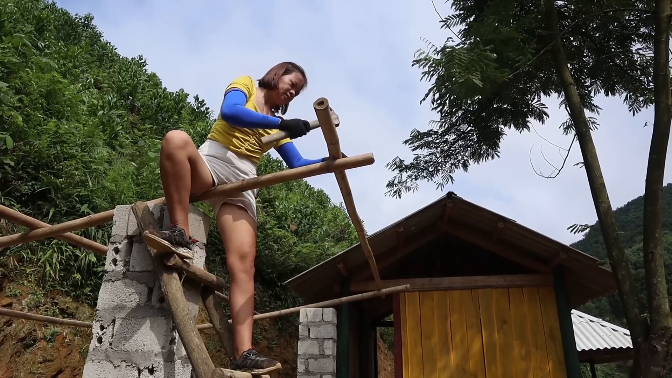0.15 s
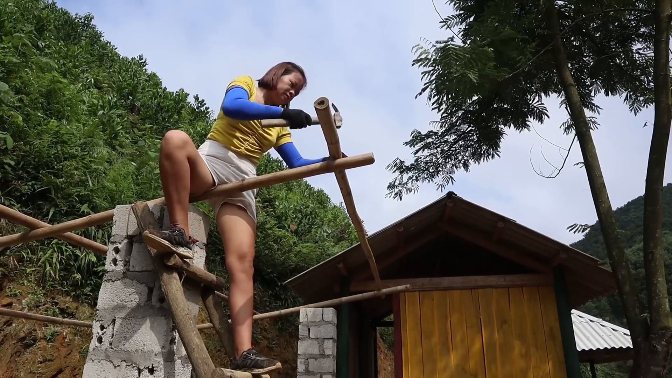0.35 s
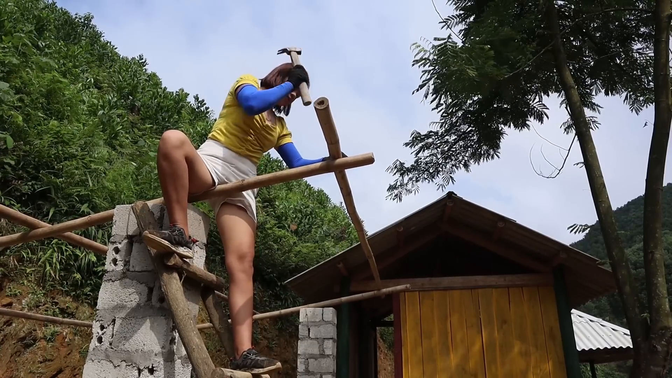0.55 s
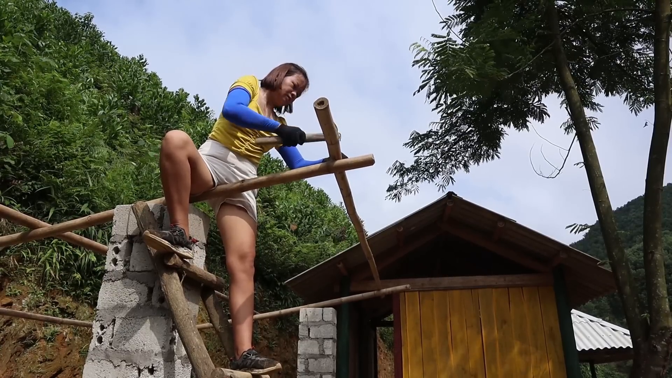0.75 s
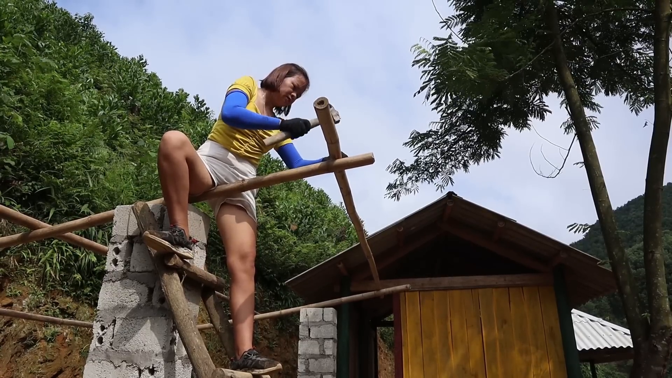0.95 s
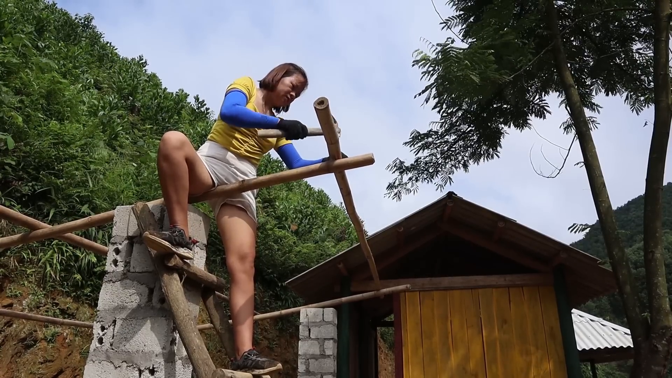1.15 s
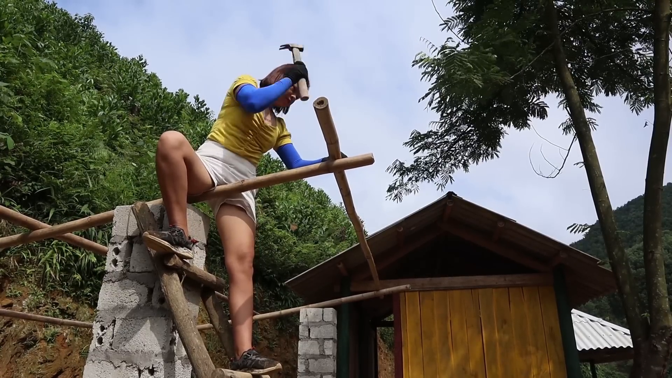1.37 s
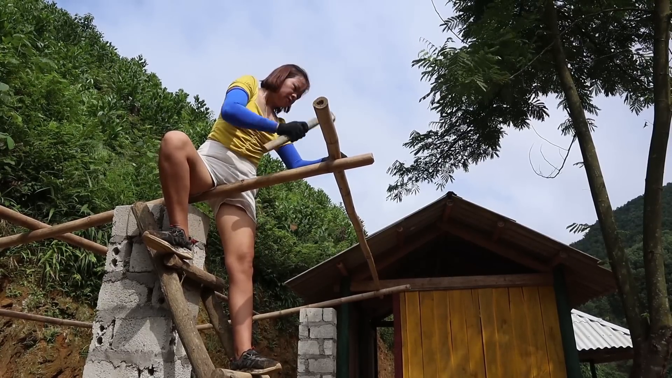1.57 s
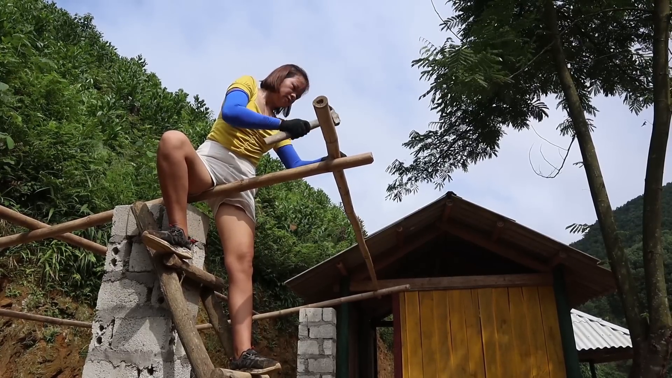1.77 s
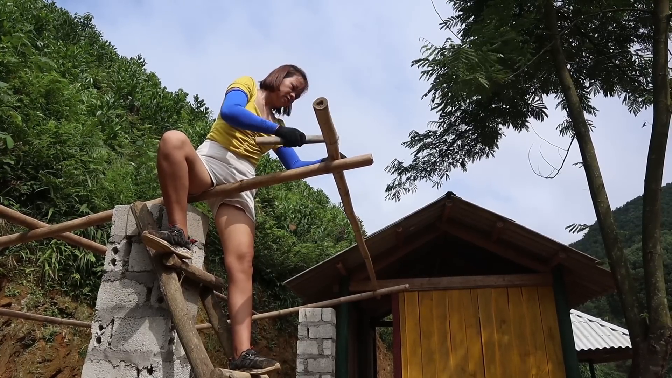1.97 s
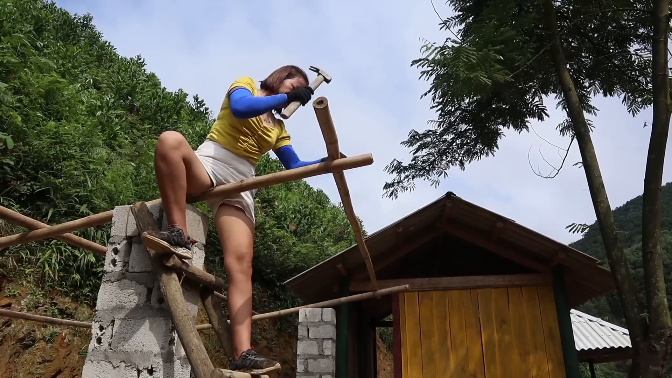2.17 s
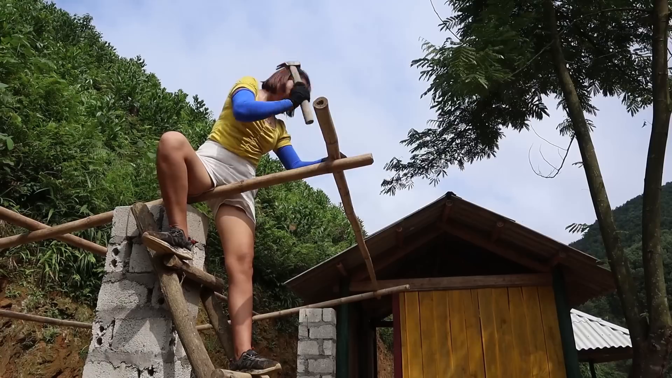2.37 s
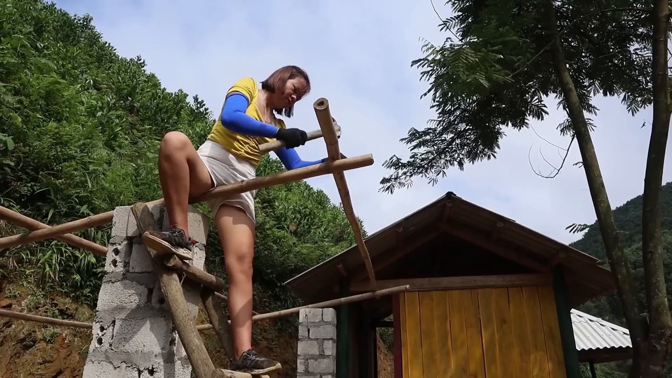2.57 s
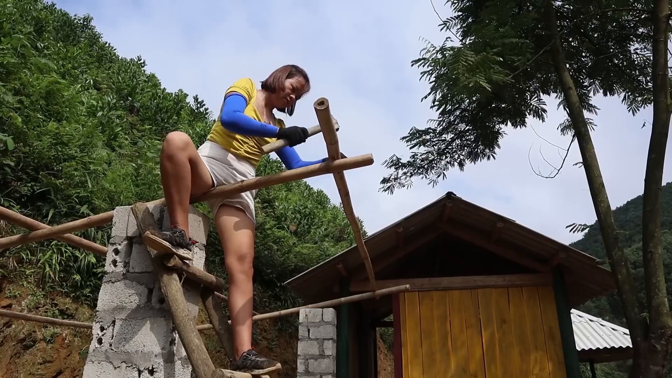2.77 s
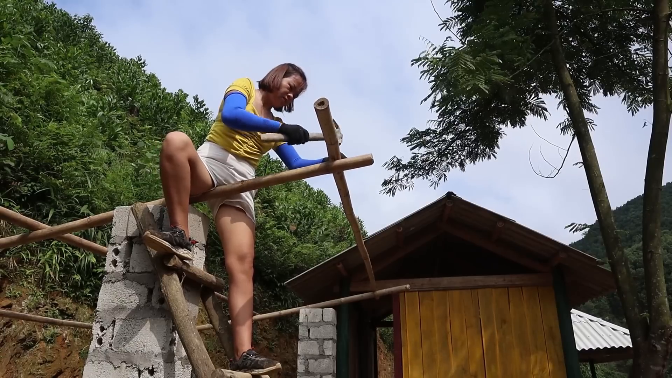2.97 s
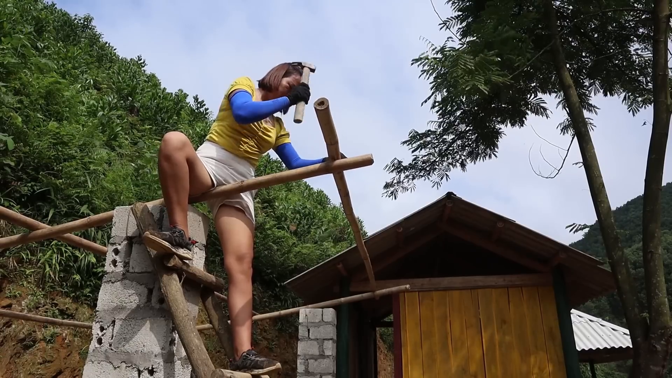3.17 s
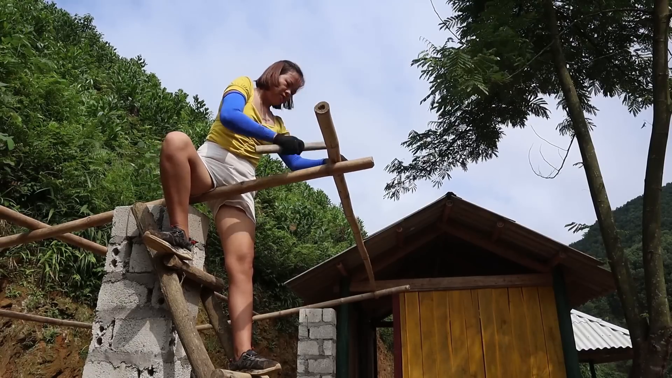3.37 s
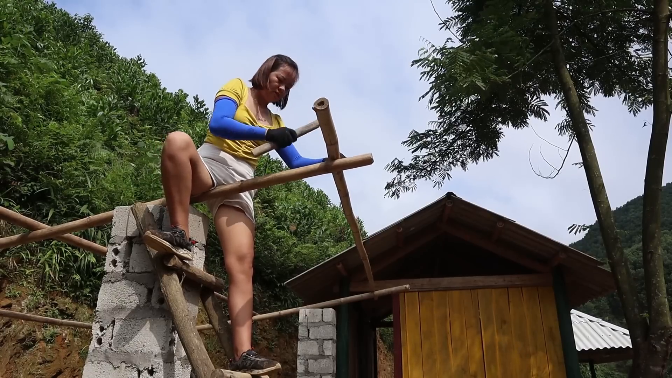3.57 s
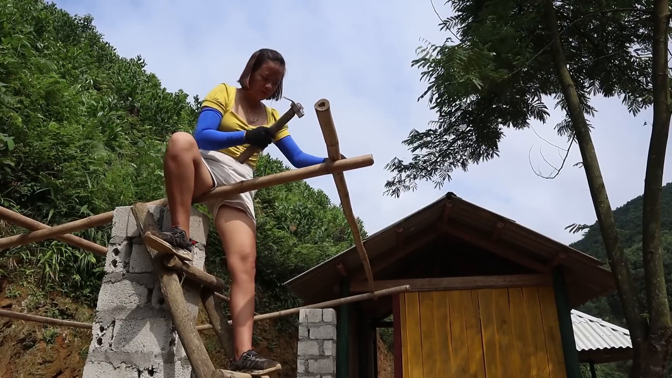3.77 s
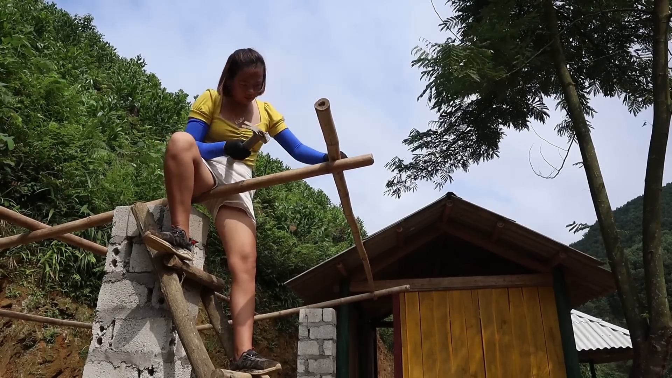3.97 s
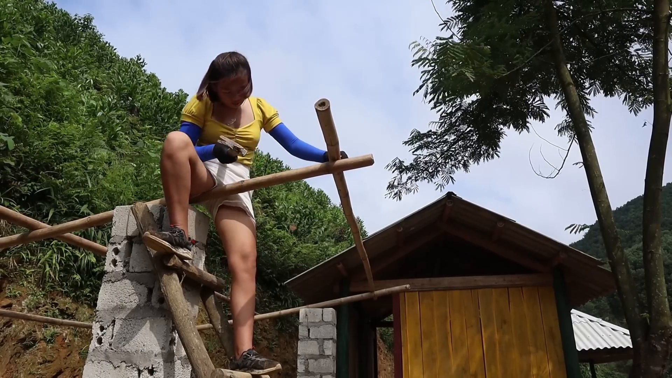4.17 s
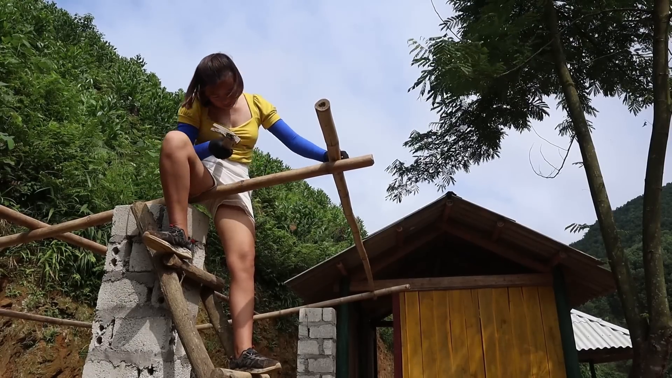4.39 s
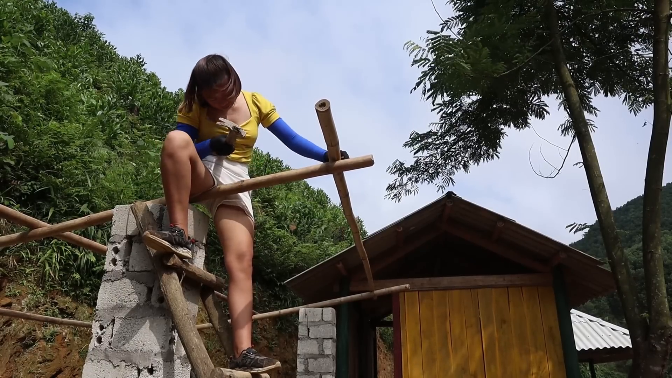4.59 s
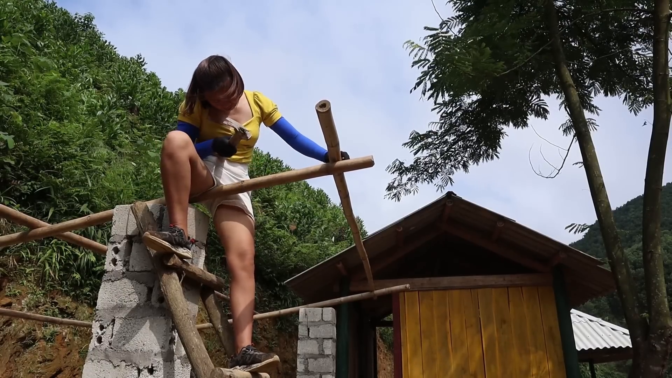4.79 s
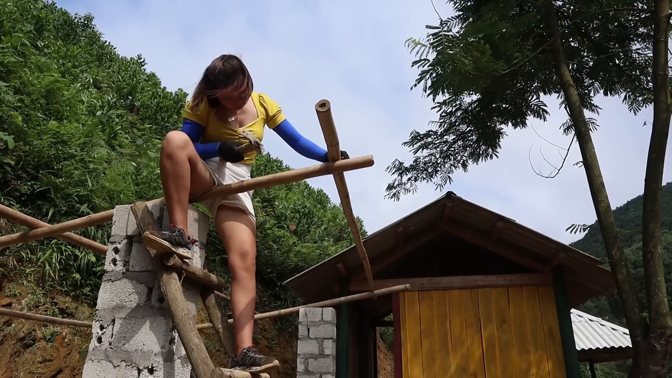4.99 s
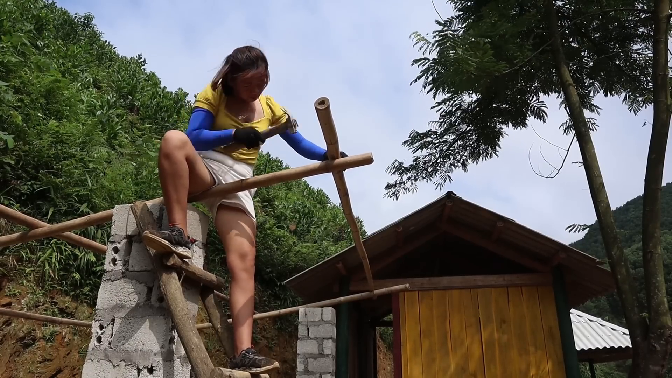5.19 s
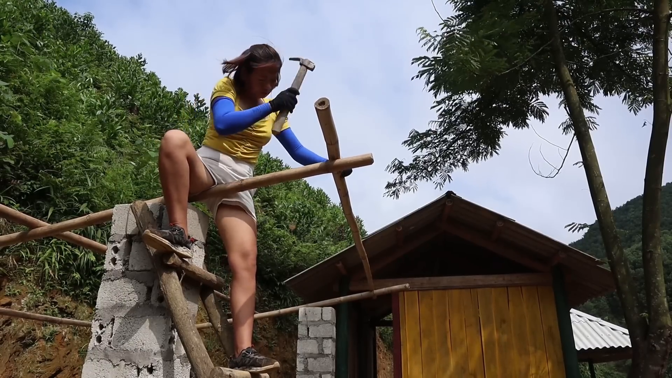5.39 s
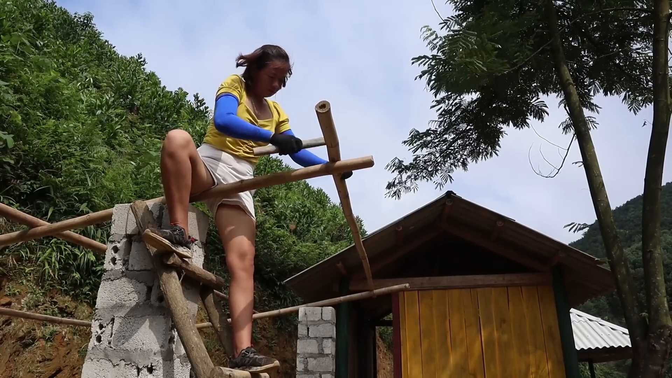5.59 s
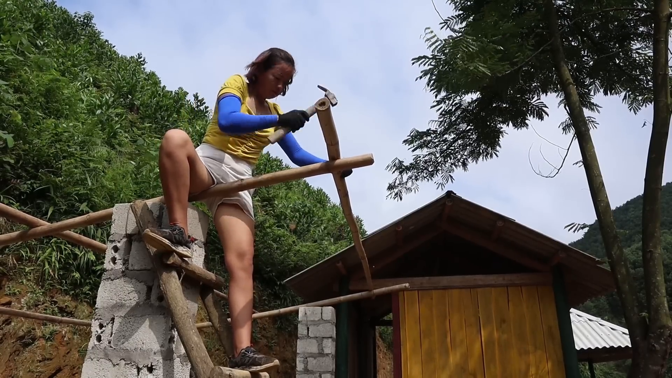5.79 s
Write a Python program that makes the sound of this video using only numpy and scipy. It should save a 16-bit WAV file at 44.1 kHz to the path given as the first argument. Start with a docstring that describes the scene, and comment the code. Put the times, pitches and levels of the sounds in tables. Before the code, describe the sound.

Sharp hammer blows ring through a pole frame on an open hillside, stop for two seconds of light wind, then strike once again.

```python
"""Hammer on a hollow wooden frame

A claw hammer strikes a nail outdoors: noise bursts crack, wandering sines ring the poles and the nail,
and short wavelets and shaped noise come back off ground, walls and slope. Jolted poles knock on their rests.
Faint ticks are narrow noise bursts and a far bird chirps in falling sines. Light wind buffets the
microphone ports as lumpy low noise and single puffs, over the wide hiss of a wooded hillside."""
import sys
import numpy as np
from scipy import signal
from scipy.fft import rfft, irfft, next_fast_len
from scipy.io import wavfile
from scipy.ndimage import uniform_filter1d, map_coordinates

SR = 44100
rng = np.random.default_rng(int(sys.argv[2]) if len(sys.argv) > 2 else 0)


def bounce(signal):
    """Save signal as a 16-bit WAV file at the path given by the first command-line argument."""
    frames = np.transpose(np.atleast_2d(signal))
    limited = np.clip(frames, -1, 1)
    pcm = np.round(limited * 32767).astype(np.int16)
    wavfile.write(sys.argv[1], SR, pcm)


N = 257544
LEAD = SR // 10  # samples of room for sounds that begin just before the start


# Blows: start_s, level_db, hardness_db (high when the steel meets the nail squarely),
# body_db, edge_db, echo_db, nail_ring_db; levels are relative, before the colour of the blow
BLOWS = [(-.03, -17, 12, -8.5, -1.5, -16, -36.5), (.343, -13.5, 3.5, -4, -0.5, -2.5, -46),
         (.827, -15, 11, -1.5, -2, -6.5, -33.5), (1.181, -14, 3, 0, -1.2, -1.5, -51.5),
         (1.7043, -15, 10.5, -8.5, 0.95, -11, -23), (2.067, -14, 4.5, -1.5, 1.5, 0, -53.5),
         (2.571, -17, 12.5, 2, 0, -0.5, -47), (2.99, -12.5, 2.5, -4, -0.5, -1, -54.5),
         (3.475, -14, 8.5, 2, 2, -1.5, -50), (5.694, -15.5, 6.5, 6, 3, -3, -47.5)]
# Colour of a blow: pitch_hz, gain_db at zero hardness, gain_db per dB of hardness,
# share of body_db (ratio), share of edge_db (ratio)
BLOW_COLOUR = [(247, -11, 1.126, 0.062, .02), (710, 0.22, -0.093, 0.97, .02), (786, -2, 0.3944, 0.83, .02),
               (1670, -0.5, -0.26, .02, 0.018), (2768, 2, 0.34, .02, 0.94), (4500, -0.22, 0.92, .02, .7),
               (9000, -6.5, 1.5541, .02, 0.018), (14100, -10.5, 1.5, .02, .02)]
RING_SOFT, RING_PER_DB = 0.87, 0.0459  # factor on pole and tail decays: base, and gain per dB of hardness


def hammer():
    """Each blow excites crack, rings, echoes and tail; its hardness colours them and lengthens poles and tail."""
    track = np.zeros((2, N + LEAD))
    t = np.arange(SR * 3 // 5) / SR
    colour_hz, soft_db, per_db, body_share, edge_share = np.transpose(BLOW_COLOUR)
    for start_s, level_db, hardness_db, body_db, edge_db, echo_db, nail_db in BLOWS:
        stretch = RING_SOFT + RING_PER_DB * hardness_db
        rings = amp(-2) * pole_ring(t, stretch) + nail_ring(t, nail_db)
        direct = amp(9.5) * crack(t) + rings * onset(t, 0.00061) + slap(t, echo_db)
        blow = direct + amp(2) * scattered_tail(t, stretch) + slope_answer(t)
        gain_db = soft_db + per_db * hardness_db + body_share * body_db + edge_share * edge_db
        colour = list(zip(colour_hz, gain_db))
        add(track, start_s, amp(level_db) * filtered(blow, causal(colour)))
    return track[:, LEAD:]


# Spectrum of the steel contact: pitch_hz, relative level_db (per Hz)
CRACK_SPECTRUM = [(120, -50), (200, -8), (558, -8.5), (1210, -9.5), (1770, -1), (2330, -17), (2910, -17),
                  (4040, -17), (5520, -21.5), (8420, -20.5), (16000, -55.5)]
# The ground returns the crack once, duller: pitch_hz, gain_db
CRACK_RETURN = [(2000, -0.5), (5000, -9), (10000, -14.5)]


def crack(t):
    """Steel contact lasts a few milliseconds; the two ports hear its treble differently."""
    burst = pair(len(t), CRACK_SPECTRUM, [(1500, 1), (5000, 0.59), (9000, 0.35)])
    burst *= amp([[-1.8], [1.8]])
    burst *= decay(t, 0.015) * onset(t, 0.00047)
    delayed = np.roll(burst, round(ECHOES[0][0] * SR), axis=1)
    return burst + filtered(delayed, causal(CRACK_RETURN))


# Modes of the pole frame: pitch_hz, relative level_db (varied per blow), t60_s (before stretch)
POLE_MODES = [(151, -18, 0.58), (324, -16.5, 0.378), (453.4, -18, 0.41), (521, -11, 0.25),
              (631.3, -16, 0.4), (693.2, 1.5, 0.2), (786, -10, 0.3), (1015, -19, 0.21), (1119, -9, 0.12),
              (1330, -5.5, 0.025), (1428, -2, .2), (1530, -10, 0.29), (1653, 3.5, 0.14), (1835, -7, 0.19),
              (1945, -10.5, 0.15), (2070, -19.5, 0.056), (2390, -16, 0.19), (2855, -2.5, 0.08)]


def pole_ring(t, stretch):
    """Hollow poles ring in dying modes, each varying in strength from blow to blow."""
    return sum(ringing(t, pitch_hz, level_db + rng.normal(0, 2.5), t60_s * stretch, blur=1.15)
               for pitch_hz, level_db, t60_s in POLE_MODES)


NAIL_HZ, NAIL_T60_S = 4550, .35


def nail_ring(t, level_db):
    """The struck nail rings as one high mode with a wandering phase."""
    return ringing(t, NAIL_HZ, level_db, NAIL_T60_S, blur=1.5)


# Ground and walls: delay_s (to half a millisecond before the slap centre), relative level_db
ECHOES = [(.0068, -1), (.0158, -1), (.0235, -7), (.032, -10)]


def slap(t, echo_db):
    """Ground and walls send back short, duller slaps."""
    total = 0
    for delay_s, wall_db in ECHOES:
        level_db = wall_db + echo_db + 12 + rng.normal(0, 1.5)
        total = total + amp(level_db) * wavelet(t - delay_s - .0005, hz=1500, cycles=.7)
    return total


# Spectrum of the scattered reflections: pitch_hz, relative level_db (per Hz)
SCATTER_SPECTRUM = [(53, -62), (90, -33.5), (139, -20), (568, -7), (690, -0.5), (876, -9), (1510, -8),
                    (2270, -22.5), (2890, -24), (3830, -30), (7330, -39.5), (8720, -46), (11000, -70),
                    (16000, -110)]
# Decay of the scattered reflections: pitch_hz, t60_s (before stretch)
SCATTER_DECAY = [(100, 0.6), (260, 0.25), (700, 0.2), (1840, 0.24), (4850, 0.2), (8500, 0.25),
                 (10000, 0.081), (12000, .07), (15000, .04)]
# Stereo likeness of the scattered reflections: pitch_hz, left-right correlation (-1 to 1)
SCATTER_LIKENESS = [(60, 0.94), (180, 1), (550, 1), (1650, 0.92), (4970, 0.2), (15000, 0.78)]


def scattered_tail(t, stretch):
    """Many small reflections arrive in uneven clumps; each frequency dies at its own speed."""
    noise = pair(len(t), SCATTER_SPECTRUM, SCATTER_LIKENESS)
    clumps = patchy(noise, depth_db=2.5, bins=7, frames=2)
    return dying(clumps, SCATTER_DECAY, stretch) * onset(t, 0.0063)


# Answer of the slope: pitch_hz, relative level_db (per Hz)
SLOPE_SPECTRUM = [(150, -32), (450, -8.5), (700, 3.5), (1000, -2.5), (1500, 5), (2200, -6), (3000, -10.5),
                  (4500, -16), (7000, -31), (10000, -37), (13000, -68.5), (16000, -110)]


def slope_answer(t):
    """The slope answers with a wide, diffuse tail that swells slowly before it dies."""
    diffuse = pair(len(t), SLOPE_SPECTRUM, [(500, 0.43), (2000, 0.088)])
    return amp(-24) * diffuse * decay(t, 0.86) * onset(t, 0.13)


# Poles knocking back on their rests: start_s, click_db, rattle_db, rattle_t60_s (at least 0.03 s),
# first_touch_db
POLE_KNOCKS = [(.152, -15.5, -21.5, 0.19, -28), (.211, -39, -35, 0.3, -48), (1.008, -13, -24, 0.23, -25),
               (1.028, -17, -26.5, .09, -33), (1.084, -30.5, -37, 0.26, -36),
               (1.895, -11.5, -23.5, 0.29, -26), (1.918, -25, -26.5, 0.052, -37),
               (1.949, -23.5, -34.5, 0.25, -44), (1.977, -24.5, -35.5, 0.26, -33),
               (2.6, -13, -29, 0.15, -33), (2.642, -12.5, -23.5, 0.11, -30), (2.722, -20, -34, 0.24, -35),
               (2.823, -21.5, -32.5, 0.26, -28), (2.888, -36, -44.5, 0.26, -44),
               (3.709, -30.5, -39, 0.29, -43), (5.834, -22.5, -36.5, .2, -30)]
# Spectrum of the frame's rattle: pitch_hz, relative level_db (per Hz)
RATTLE_SPECTRUM = [(53, -42.5), (90, -13.5), (314, 5.5), (557, -1.5), (788, 2.5), (1340, -12.5),
                   (1900, -16.5), (2110, -25.5), (2920, -25.5), (6900, -46), (12000, -74.5), (15600, -99),
                   (22000, -120)]
CLICK_HZ, RATTLE_TREBLE_DB = 960, 4
TOUCH_LEAD_S, TOUCH_HZ, TOUCH_RATTLE_DB = .0075, 355, -7.5  # rattle level is relative to the main knock


def knocks():
    """Wood on wood: a duller first touch, then a dull click, each with a short rattle of the frame."""
    track = np.zeros((2, N + LEAD))
    t = np.arange(SR // 3) / SR
    contacts = []
    for start_s, click_db, rattle_db, t60_s, touch_db in POLE_KNOCKS:
        contacts.append((start_s, click_db, CLICK_HZ, rattle_db, t60_s))
        contacts.append((start_s - TOUCH_LEAD_S, touch_db, TOUCH_HZ, rattle_db + TOUCH_RATTLE_DB, t60_s))
    for start_s, click_db, hz, rattle_db, t60_s in contacts:
        thud = wavelet(t - 2.2 / hz, hz, cycles=1)
        overtone = amp(-14) * wavelet(t - 1.5 / hz, 2.3 * hz, cycles=.8)
        click = amp(click_db) * (thud + overtone)
        noise = pair(len(t), RATTLE_SPECTRUM, [(300, 1), (1500, .95), (7000, .3)])
        rattle = patchy(noise, depth_db=2.2, bins=7, frames=2)
        rattle *= amp(rattle_db) * decay(t, max(t60_s, .03))
        rattle *= onset(t, 0.0014) * (1 + 1.8 * decay(t, 0.0056))  # extra bite at the start
        bright = filtered(rattle, causal([(400, 0.0076), (1500, RATTLE_TREBLE_DB)]))
        add(track, start_s, click + bright)
    return track[:, LEAD:]


# Small far ticks: centre_s, relative level_db, pitch_hz, left_over_right_db
TICKS = [(.691, -51, 587, 4), (1.443, -64.5, 7300, -6), (3.943, -51, 4120, -1.5), (4.241, -60.5, 4405, -9),
         (5.117, -56.5, 3830, -2.5), (5.307, -65, 6180, -4), (5.5, -61.5, 4570, 6)]
TICK_WIDTH = 0.15  # half-width of the shaped band, as a share of the pitch


def ticks():
    """Short faint clicks: noise in a narrow band under a bell-shaped envelope."""
    track = np.zeros((2, N + LEAD))
    t = np.arange(SR // 50) / SR - .01
    for centre_s, level_db, pitch_hz, pan_db in TICKS:
        band = [(pitch_hz * (1 + TICK_WIDTH * step), -40 * step ** 2) for step in (-1, -.5, 0, .5, 1)]
        click = pair(len(t), band, [(1000, 0.38)])
        click *= np.exp(-(t / .004) ** 2)
        add(track, centre_s + t[0], click * panned(level_db, pan_db))
    return track[:, LEAD:]


# A far bird's chirps: start_s, length_s, level_db (before the flutter)
CHIRPS = [(4.21, .1, -74), (4.57, .15, -75)]
CHIRP_HZ, CHIRP_FALL_HZ = 4640, 950  # starting pitch, and fall over each chirp


def bird():
    """Faint whistles: sines falling steadily in pitch and fluttering in level."""
    track = np.zeros((2, N + LEAD))
    for start_s, length_s, level_db in CHIRPS:
        progress = np.arange(round(length_s * SR)) / (length_s * SR)
        pitch_hz = CHIRP_HZ - CHIRP_FALL_HZ * progress
        tone = np.sin(2 * np.pi * np.cumsum(pitch_hz) / SR)
        tone *= np.sin(np.pi * progress) ** .5
        flutter_db = 5 * wobble(60)[:len(progress)]
        add(track, start_s, amp(level_db + flutter_db) * tone * np.ones((2, 1)))
    return track[:, LEAD:]


# Wind strength: time_s, relative buffet level_db
WIND_STRENGTH = [(0, -49.5), (.3, -59.5), (.55, -49.5), (.9, -63), (1.5, -57.5), (1.95, -58), (2.4, -64),
                 (2.8, -49.5), (3.15, -62), (3.4, -49.5), (3.87, -46.5), (4.05, -51.5), (4.33, -51.5),
                 (4.5, -30), (4.66, -48), (4.82, -48), (5.14, -48), (5.3, -52.5), (5.45, -52.5),
                 (5.84, -58)]
# Spectrum of the buffeting: pitch_hz, relative level_db (per Hz)
BUFFET_SPECTRUM = [(12, -37), (20, -8.5), (48, 11.5), (92, 5), (134, -10.5), (209, -19.5), (265, -20.5),
                   (300, -16), (390, -39), (660, -120)]


def wind():
    """Turbulent air presses on the ports: lumpy low buffeting plus single puffs."""
    strength_db = curve(WIND_STRENGTH)
    shared_db = 3.2 * wobble(8.1) + 2.5 * wobble(10)
    per_port_db = 1.1 * np.array([wobble(12), wobble(20)])
    rumble = pair(N, BUFFET_SPECTRUM, [(40, 1.0), (200, 0.9)])
    lumpy = unit(amp(shared_db + per_port_db) * rumble)
    buffet = amp(strength_db) * lumpy * amp([[.7], [-.7]])
    return buffet + puffs(strength_db)


# Strongest puffs of air on the ports: centre_s, relative level_db, pitch_hz, left_over_right_db
STRONG_PUFFS = [(2.91, -36, 92, -6), (3.325, -38.5, 113, 4), (3.864, -32, 110, 6), (3.92, -45, 97.3, 10),
                (4.29, -43.5, 94, -3), (4.405, -36.5, 89, -1), (4.44, -35, 148, -2),
                (4.477, -23.5, 192, 16), (4.531, -22.5, 120.3, 3), (4.558, -29.5, 152.8, 14),
                (4.61, -28, 159, -7), (4.875, -39, 144, 3), (4.94, -35, 127, 7), (5.095, -36.5, 119.6, -3),
                (5.14, -26, 154.6, -2), (5.173, -34, 175, 3), (5.428, -38, 108.8, .5),
                (5.49, -41.5, 160, -2), (5.595, -36, 144, 1)]
SMALL_PUFFS = 60  # scattered at random, following the wind strength
SMALL_DB, SMALL_SPREAD_DB, SMALL_HZ = 5, 0.5, 125  # level over the wind strength, its spread, middle pitch


def puffs(strength_db):
    """Brief low pushes of air, partly common to both ports and partly opposite between them."""
    track = np.zeros((2, N + LEAD))
    t = np.arange(SR // 20) / SR - .025
    at = rng.integers(0, N, SMALL_PUFFS)
    chance = rng.standard_normal((SMALL_PUFFS, 3))
    small_db = strength_db[at] + SMALL_DB + SMALL_SPREAD_DB * chance[:, 0]
    small_hz = SMALL_HZ * np.exp(.2 * chance[:, 1])
    small = zip(at / SR, small_db, small_hz, 4 * chance[:, 2])
    for centre_s, level_db, pitch_hz, pan_db in [*STRONG_PUFFS, *small]:
        common = wavelet(t, pitch_hz, cycles=0.38)
        opposite = amp(-7.0) * wavelet(t, pitch_hz * 1.5, cycles=0.53) * [[1], [-1]]
        add(track, centre_s + t[0], (common + opposite) * panned(level_db, pan_db))
    return track[:, LEAD:]


# Spectrum of the hillside: pitch_hz, relative level_db (per Hz)
HILL_SPECTRUM = [(88, -26), (150, -7.5), (231, -23), (270, -19), (448, -14), (475, -15.5), (589, -16),
                 (805, -19), (1240, -20), (3040, -24), (4160, -25), (11700, -39), (16000, -68)]
# Stereo likeness of the hillside: pitch_hz, left-right correlation (-1 to 1)
HILL_LIKENESS = [(60, 0.77), (180, -0.023), (550, -0.04), (1650, -0.11), (4970, -0.51), (15000, -0.89)]
HILL_DB = -57.5  # middle level, before the wobble and a slight lean to the right


def hillside():
    """Far leaves and insects blend into a wide, slightly unsteady hiss."""
    hiss = patchy(pair(N, HILL_SPECTRUM, HILL_LIKENESS), depth_db=1.5, bins=4, frames=12)
    return amp(HILL_DB + 0.76 * wobble(1.9)) * hiss * amp([[-.7], [.7]])


def amp(db):
    """Decibels to a linear factor."""
    return 10 ** (np.asarray(db) / 20)


def unit(x):
    """x scaled to rms 1."""
    return x / np.sqrt(np.mean(x ** 2) + 1e-20)


def decay(t, t60_s):
    """Exponential fall of 60 dB in t60_s."""
    return amp(-60 * t / t60_s)


def onset(t, rise_s):
    """Exponential rise from 0 towards 1 with time constant rise_s."""
    return 1 - np.exp(-t / rise_s)


def panned(level_db, left_over_right_db):
    """Left and right factors around a level."""
    return amp([[level_db + left_over_right_db / 2], [level_db - left_over_right_db / 2]])


def along(points, hz):
    """(Hz, value) points read on a log frequency axis."""
    f, v = np.transpose(points)
    return np.interp(np.log(hz + 1), np.log(f + 1), v)


def curve(rows):
    """(s, value) rows read as one value per sample."""
    return np.interp(np.arange(N) / SR, *np.transpose(rows))


def wobble(rate):
    """A smooth random curve with rate knots a second."""
    knots = rng.standard_normal(int(N * rate / SR) + 4)
    return map_coordinates(knots, [np.arange(N) * rate / SR])


def filtered(x, response):
    """x times a response of frequency."""
    m = next_fast_len(x.shape[-1] + 8192)
    return irfft(rfft(x, m) * response(np.fft.rfftfreq(m, 1 / SR)), m)[..., :x.shape[-1]]


def causal(points):
    """The minimum-phase response with the gain of (Hz, dB) points."""
    def response(hz):
        cepstrum = irfft(np.log(amp(along(points, hz)) + 1e-6))
        # fold the mirrored half forward in time
        cepstrum[1:len(cepstrum) // 2] *= 2
        cepstrum[len(cepstrum) // 2 + 1:] = 0
        return np.exp(rfft(cepstrum))
    return response


def pair(n, spectrum, alike):
    """Stereo noise of rms 1 with a spectrum and a left-right likeness."""
    def mid_side_gain(hz):
        turn = np.arccos(np.clip(along(alike, hz), -1, 1)) / 2
        return amp(along(spectrum, hz)) * [np.cos(turn), np.sin(turn)]
    mid, side = filtered(rng.standard_normal((2, n)), mid_side_gain)
    return unit(np.array([mid + side, mid - side]))


def dying(x, t60s, stretch):
    """Each frequency of x dies at its own speed."""
    hz, t, z = signal.stft(x, SR, nperseg=128)
    fade = decay(t, stretch * along(t60s, hz)[:, None])
    return signal.istft(z * fade, SR, nperseg=128)[1][:, :x.shape[1]]


def patchy(x, depth_db, bins, frames):
    """x with patches of random gain in time and frequency, at rms 1."""
    z = signal.stft(x, nperseg=256)[2]
    field = uniform_filter1d(rng.standard_normal(z.shape[1:]), size=bins, axis=0)
    field = uniform_filter1d(field, size=frames, axis=1)
    return unit(signal.istft(z * amp(depth_db * unit(field)), nperseg=256)[1][:, :x.shape[1]])


def wavelet(t, hz, cycles):
    """A pulse centred on t = 0 at a random phase; cycles sets its width."""
    return np.exp(-(hz * t / cycles) ** 2) * np.cos(2 * np.pi * (hz * t + rng.random()))


def ringing(t, hz, db, t60, blur):
    """A dying mode whose phase wanders, as close modes of rough wood beat; higher modes blur more."""
    wander = np.cumsum(rng.standard_normal(len(t))) * blur * hz / SR
    return amp(db) * decay(t, t60) * np.sin(2 * np.pi * (hz * t + rng.random()) + wander)


def add(track, s, sound):
    """Mix a sound into a track that starts LEAD samples early."""
    part = track[:, round(s * SR) + LEAD:][:, :sound.shape[1]]
    part += sound[:, :part.shape[1]]


def scene():
    """Hammer and knocking poles in front, ticks and bird far off, wind and hillside throughout."""
    return hammer() + knocks() + ticks() + bird() + wind() + hillside()


TOP_HZ = 16300  # band limit


def record(dry):
    """The microphone loses the deepest bass, the loudest peaks flatten at full scale, the top is cut off."""
    sensed = filtered(dry, lambda hz: (1j * hz / (35 + 1j * hz)) ** 2)
    flattened = sensed / (1 + np.abs(sensed) ** 6) ** (1 / 6)
    return filtered(flattened, lambda hz: hz < TOP_HZ)


dry = scene()
out = record(dry)
bounce(out)
```